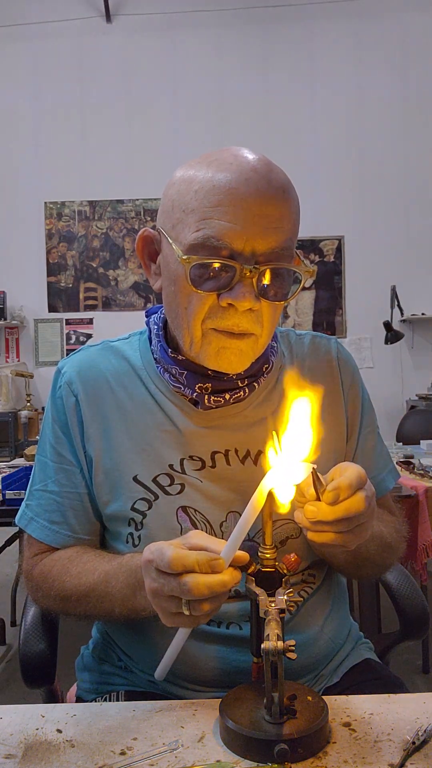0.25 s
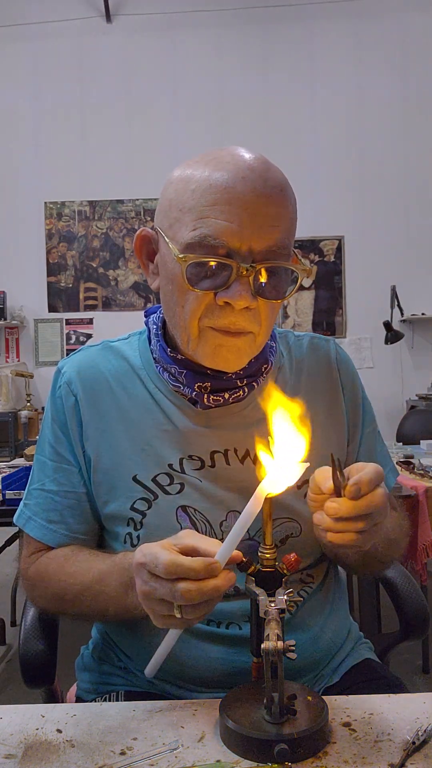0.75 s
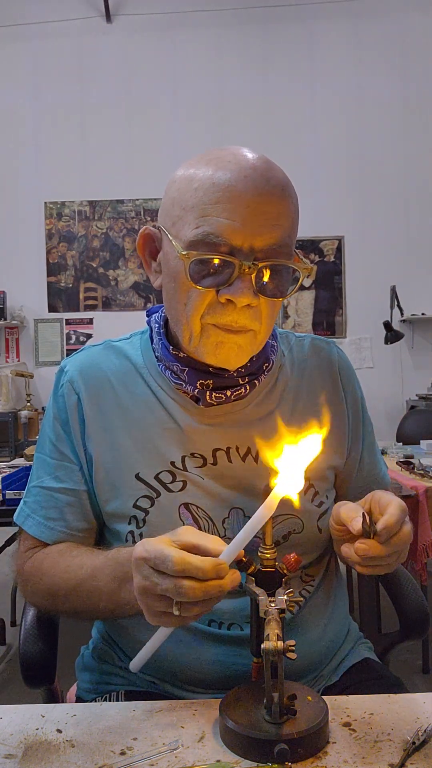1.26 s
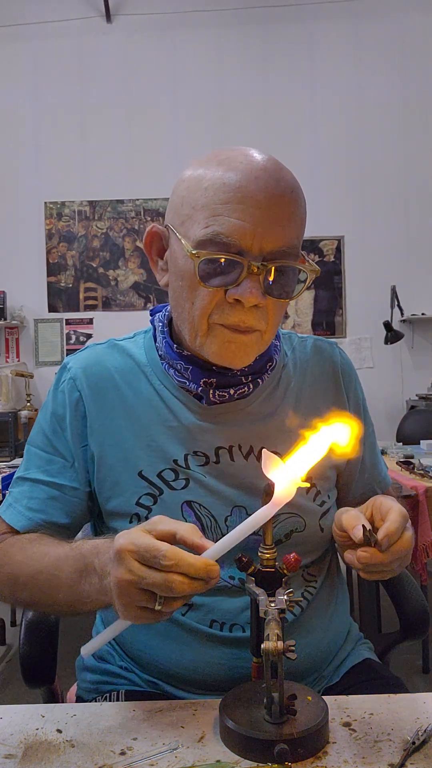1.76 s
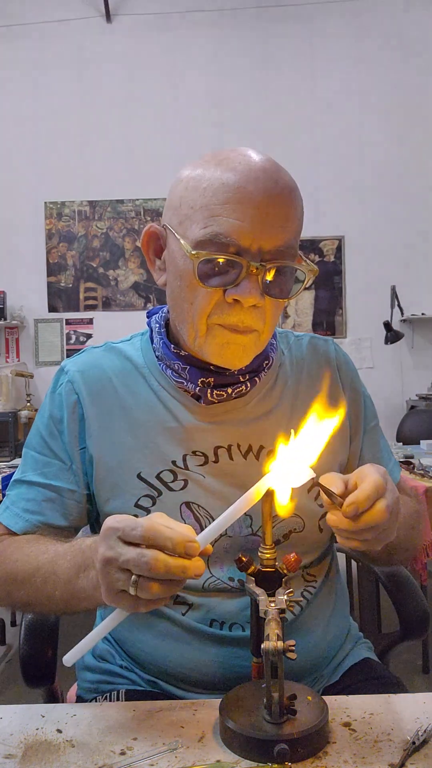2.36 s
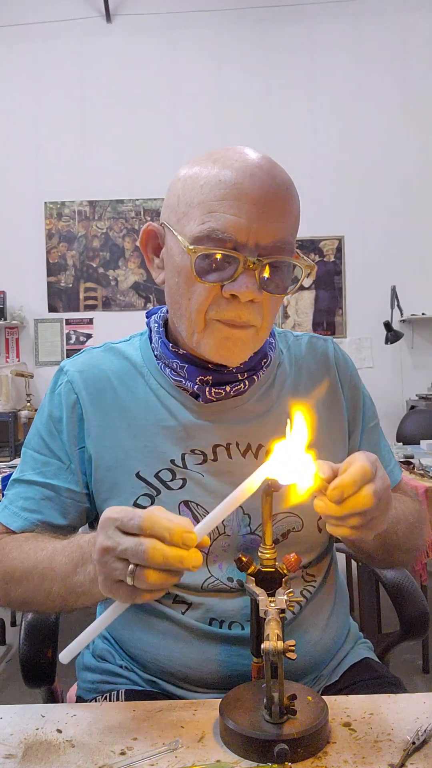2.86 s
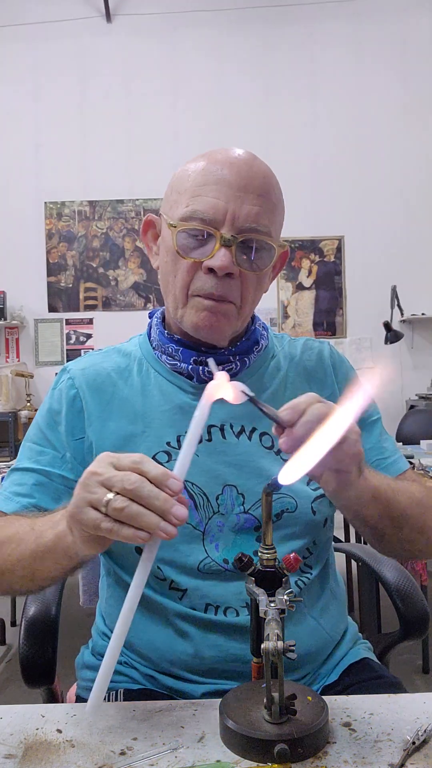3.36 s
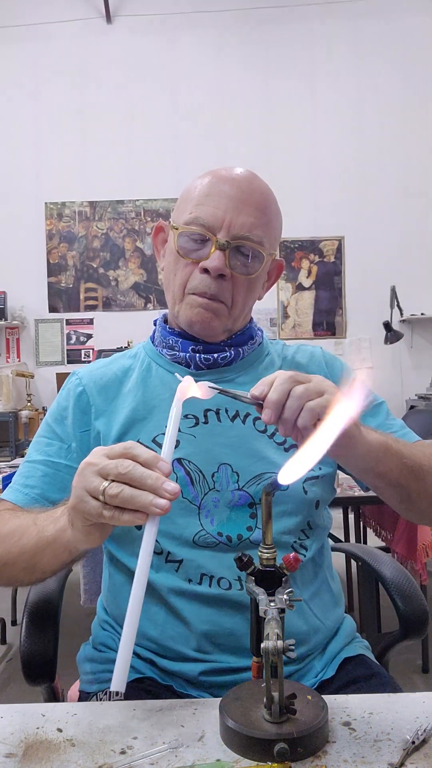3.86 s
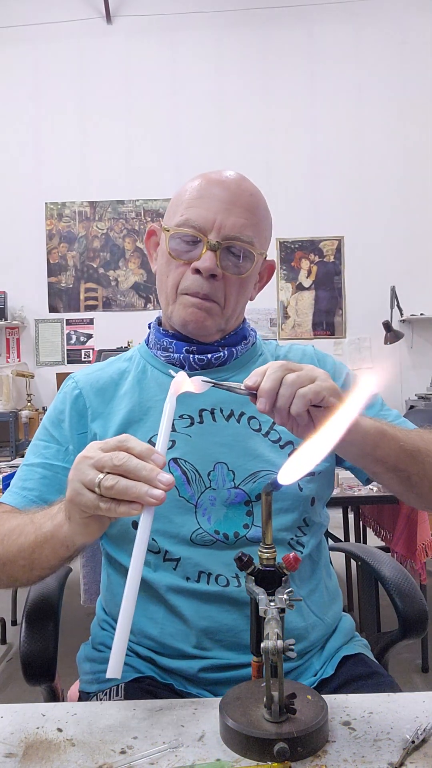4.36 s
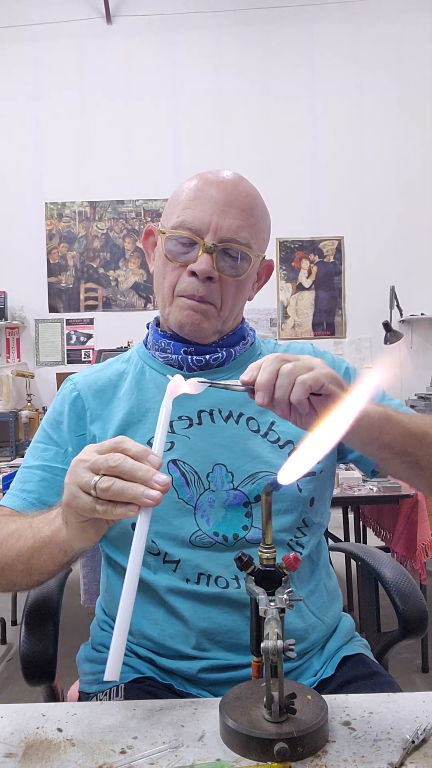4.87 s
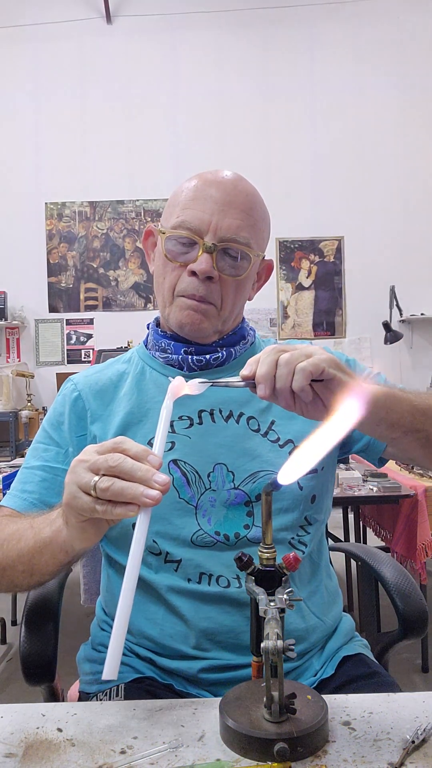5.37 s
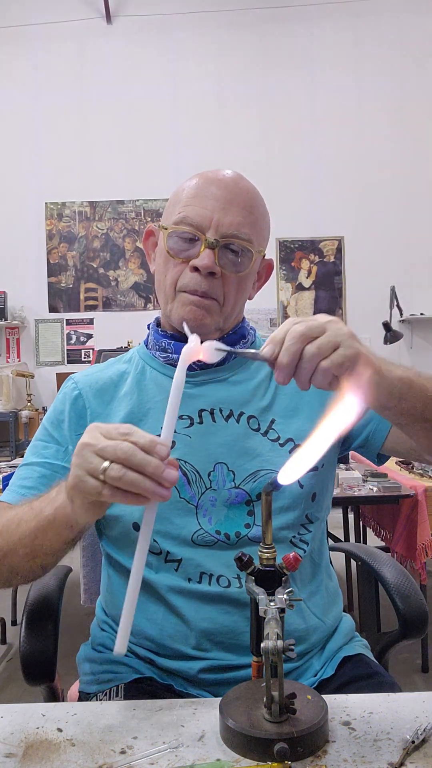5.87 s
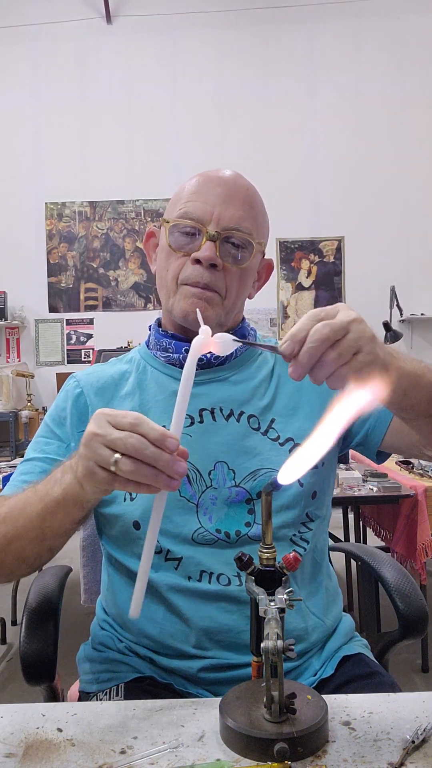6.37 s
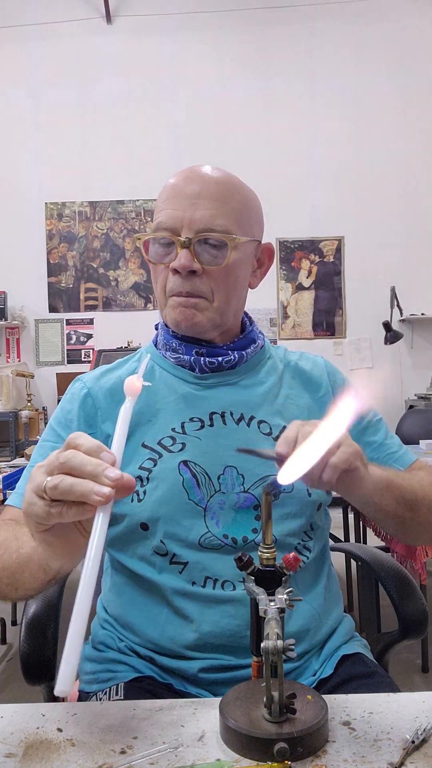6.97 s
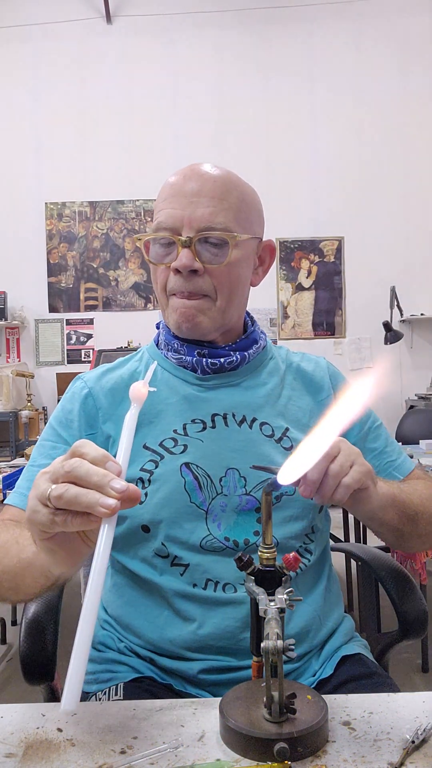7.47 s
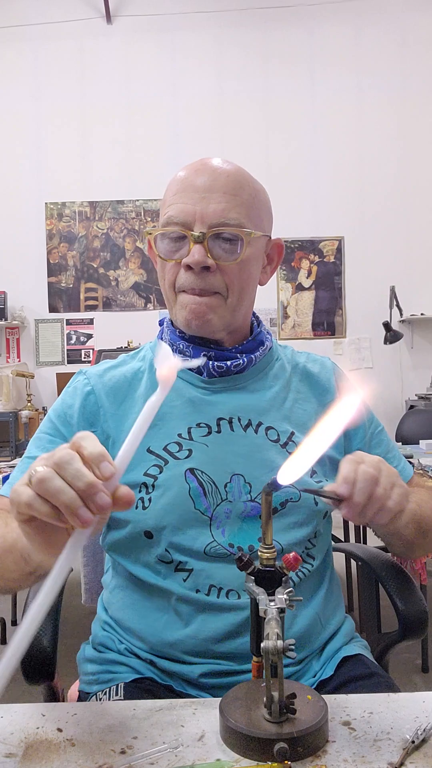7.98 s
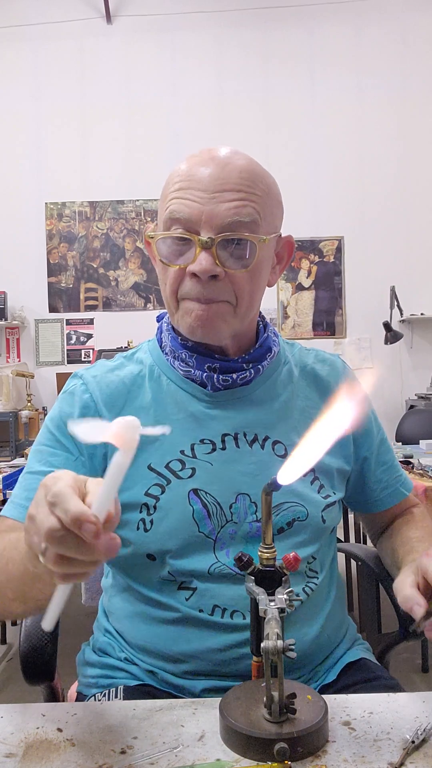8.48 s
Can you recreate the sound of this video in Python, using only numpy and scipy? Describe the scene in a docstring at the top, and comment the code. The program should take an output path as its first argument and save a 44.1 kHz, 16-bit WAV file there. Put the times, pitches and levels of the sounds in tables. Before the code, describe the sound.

Continuous bright hiss of a bench torch flame, slightly duller once glass leaves it, above a humming, beating machine drone and low rumble.

```python
"""A gas torch burns on a workbench near a phone: band-split noise flutters and sputters, coloured by narrow peaks
and dips that differ at the two microphone ports and shift as the glass leaves the flame.
Behind it a pump, built from sines at multiples of its shaft rate, slows and hums louder as pressure builds; a fan
sine beats against it, with a drone, a whine and steady tones. Shaped noise makes a throbbing rumble below,
and a faint short tone sounds once."""
import sys
import numpy as np
from scipy import signal
from scipy.fft import rfft, irfft, next_fast_len
from scipy.io import wavfile
from scipy.ndimage import uniform_filter1d, map_coordinates

SR = 44100
rng = np.random.default_rng(int(sys.argv[2]) if len(sys.argv) > 2 else 0)


def persist_wave(psi):
    """Save psi, clipped to +-1, as 16-bit WAV."""
    counts = np.round(np.clip(psi, -1, 1) * 32767).astype(np.int16)
    wavfile.write(sys.argv[1], SR, np.atleast_2d(counts).T)


N = 385287
TIME = np.arange(N) / SR
SIZE = next_fast_len(N)
HZ = np.arange(SIZE // 2 + 1) * SR / SIZE

# pump: a valve vents the pressure once a cycle, then it builds up again
VALVE_S, CYCLE_S, VENT_S, BUILD_S = 1.12, 5.23, .6, 2.7
# the glass leaves the flame
GLASS_OUT_S, GLASS_MOVE_S = 3.39, 0.2


def undb(db):
    """Amplitude factor of a level in dB."""
    return 10 ** (np.asarray(db) / 20)


def over_hz(table):
    """A (Hz, value) table read at every frequency bin, on a log frequency axis."""
    hz, value = np.transpose(table)
    return np.interp(np.log(HZ + 1), np.log(hz), value)


def over_time(table):
    """The columns of a (s, value, ..) table read at every sample."""
    s, *columns = np.transpose(table)
    return [np.interp(TIME, s, column) for column in columns]


def walk(rate_hz):
    """Random levels held 1 / rate_hz and slewed twice; spread near 1."""
    k = int(SR / rate_hz)
    held = np.repeat(rng.standard_normal(N // k + 1), k)
    slewed = uniform_filter1d(uniform_filter1d(held, k), k)
    return 1.327 * slewed[:N]


def flutter(rate_hz):
    """A quick walk with its slow drift taken out."""
    quick = walk(rate_hz)
    return quick - uniform_filter1d(quick, int(4 * SR / rate_hz))


def swell(at_s, half_s):
    """A flat-topped bump of height 1 around a moment."""
    return np.exp(-((TIME - at_s) / half_s) ** 4)


def swells_db(table):
    """Sum of the bumps in a (s, half length s, dB) table."""
    return sum(db * swell(at_s, half_s) for at_s, half_s, db in table)


def noise():
    """Spectrum of white noise at 0 dB per Hz."""
    return rfft(rng.standard_normal(SIZE)) * np.sqrt(SR / 2)


def tone(hz, rms_db, drift=0.00179, turns=None):
    """A sine whose pitch wanders by the share drift; it starts at a random phase unless one is given."""
    turns = rng.random() if turns is None else turns
    phase = 2 * np.pi * (turns + np.cumsum(hz * (1 + drift * walk(1.5))) / SR)
    return np.sqrt(2) * undb(rms_db) * np.sin(phase)


def rumble():
    """Shaped noise whose deep part throbs; returns the part alike at both ports and the part that differs."""
    # Rumble colour before the throb. Each row: frequency in Hz, level in dB per Hz.
    colour = [(25, -74), (38, -78), (50, -61), (65, -59.5), (95, -55.5), (120, -61.5), (150, -65.5),
              (190, -63.5), (215, -72), (250, -75), (300, -74.5), (350, -84), (420, -94), (600, -105),
              (900, -140)]
    # Throbs of the deep rumble. Each row: centre in seconds, change in dB.
    throbs = [(.84, 2), (1.1, -4), (1.82, 3.5), (2.15, 7), (2.999, 4), (3.38, 4.5), (3.72, 1), (4.1, 3),
              (4.65, 2), (5.95, 10.5), (6.9, 3), (7.2, 6.5), (8.15, 1), (8.451, 4)]
    throb_half_s, rest_db, split_hz = 0.084, -7, 108
    upper_share = 0.22  # of the throb's dB swing
    colour_db = over_hz(colour)
    alike, apart = noise() * undb(colour_db), noise() * undb(colour_db - 24.0)
    throb_db = rest_db + sum(db * swell(at_s, throb_half_s) for at_s, db in throbs)
    deep = irfft(alike * (HZ < split_hz), SIZE)[:N] * undb(throb_db)
    upper = irfft(alike * (HZ >= split_hz), SIZE)[:N]
    upper = upper * undb(upper_share * (throb_db - throb_db.mean()))
    # the ports differ more as the wavelength shrinks
    side = irfft(apart * (1 + np.clip(HZ / 230, 0, 3) ** 2), SIZE)[:N]
    return deep + upper, side


def steady_tones():
    """Sines of fixed centre pitch, each wandering in level and slightly in pitch."""
    # Each row: frequency in Hz, mid level in dB (RMS).
    tones = [(123.1, -55), (166.2, -56.5), (293.4, -68.5), (372.5, -75.5), (438.4, -75), (598, -79),
             (879, -79), (1018, -74.5), (1047, -70), (1108, -79.5), (2200, -78)]
    return sum(tone(hz, db + 3.9 * walk(2.48), drift=0.00249) for hz, db in tones)


def drone():
    """A low sine that swells several times."""
    # Each row: centre in seconds, half length in seconds, rise in dB.
    drone_swells = [(0.793, 0.088, 14.5), (2.62, 0.77, 13.5), (3.465, 0.14, 8), (3.9, 0.13, 17.5),
                    (4.303, 0.24, 12)]
    return tone(139.6, -56 + swells_db(drone_swells))  # Hz, dB at rest


def whine():
    """A sine, louder around each valve stroke, that fades late to a lower level."""
    rest_db, swell_db, half_s = -59.5, 3, 1.54
    fade_start_s, fade_length_s, fade_db = 7.35, 0.25, -11
    strokes = swell(VALVE_S, half_s) + swell(VALVE_S + CYCLE_S, half_s)
    fade = np.clip((TIME - fade_start_s) / fade_length_s, 0, 1)
    return tone(261.2, rest_db + swell_db * strokes + fade_db * fade + 1.6 * walk(3.02))


def fan():
    """A steady sine close enough to the 2nd shaft order to beat against it."""
    return tone(58.69, -49, drift=0, turns=.62)  # Hz, dB


def pump_load():
    """0-1: drops as the valve vents, climbs back ever faster, then holds."""
    since_s = (TIME - VALVE_S) % CYCLE_S
    venting = np.clip(1 - since_s / VENT_S, 0, 1)
    building = np.clip((since_s - VENT_S) / BUILD_S, 0, 1) ** 2
    return venting + building


def pump():
    """Sines at multiples of the shaft rate; load slows the shaft and raises the 2nd and 4th orders."""
    # Lesser orders. Each row: multiple of the shaft rate, mid level in dB (RMS).
    shaft_orders = [(1, -59.5), (12, -63.5), (14, -73), (20, -72), (22, -81), (24, -74), (26, -76)]
    free_shaft_hz, sag_hz = 28.499, .288
    second_db, fourth_db = (-44, -41), (-41, -38)  # (free, loaded)
    load = pump_load()
    shaft_hz = free_shaft_hz - sag_hz * load
    second = tone(2 * shaft_hz, np.interp(load, (0, 1), second_db), drift=0, turns=0)
    fourth = tone(4 * shaft_hz, np.interp(load, (0, 1), fourth_db) + 2.14 * flutter(10), drift=0)
    lesser = sum(tone(k * shaft_hz, db + 2.0 * walk(2.46)) for k, db in shaft_orders)
    return second + fourth + lesser


def machines():
    """Pump, fan, tones and rumble; nearly alike at both ports, a touch louder at the left."""
    alike, side = rumble()
    mid = pump() + fan() + drone() + whine() + steady_tones() + alike
    return mid * undb([[.2], [-.2]]) + side * np.array([[1], [-1]])


def tick():
    """A faint short sine under a bell-shaped envelope, perhaps the tool touching the glass."""
    at_s, hz, peak_db, length_s = 3.935, 2305, -52.5, .045
    return undb(peak_db) * np.exp(-((TIME - at_s) / length_s) ** 2) * np.sin(2 * np.pi * hz * TIME)


def in_flame(s):
    """Near 1 while the glass sits in the flame, near 0 once it is out."""
    return .5 - .5 * np.tanh((s - GLASS_OUT_S) / GLASS_MOVE_S)


def port(colour, ripple, hz, s):
    """dB over frequency and time: broad colour plus narrow peaks and dips that slide and change with the glass."""
    # Dips and ridges shared by both ports. Each row: centre in Hz, width in Hz,
    # dB with the glass in the flame, dB with it out.
    both_ripple = [(2820, 90, -6, -3), (4220, 175, -15, -23), (4550, 70, 5, 5.5), (4660, 88, -11, -6),
                   (5480, 80, 4, 2.5), (5690, 68, 2, -8), (12100, 420, -1, -2.5), (13200, 400, 0.5, 2.5),
                   (555, 55, -4, 1.5), (10300, 200, -6, -6), (1370, 50, 2.5, 1.5), (1590, 68, 3, 2.5),
                   (3250, 280, 1, 0), (3620, 88, 3.5, 2.5), (2160, 85, -4, -14)]
    wander, glass_wander = 0.0018, .005  # share of pitch: always, extra while the glass is in
    bells = sum(np.exp(-4 * np.log(2) * ((HZ - at_hz) / width_hz) ** 2) * np.array([[db_in], [db_out]])
                for at_hz, width_hz, db_in, db_out in ripple + both_ripple)
    glass = in_flame(s)
    slide = (wander + glass_wander * glass) * np.interp(s, TIME, walk(2.47))
    slid_hz = hz[:, None] * (1 + slide)
    glass_in, glass_out = (np.interp(slid_hz, HZ, bell) for bell in bells)
    low_cut_db = 40 * np.log10(np.clip(hz / 400, 1e-3, 1))
    broad = np.interp(hz, HZ, over_hz(colour)) + low_cut_db
    return broad[:, None] + glass * glass_in + (1 - glass) * glass_out


def colour_ports(x, depth_db, cell_hz, cell_s):
    """Each port's colour; narrow bands also drift up and down on their own, alike at both ports."""
    # Broad flame colour at each port. Each row: frequency in Hz, level in dB per Hz.
    left_colour, right_colour = [(400, -83), (1000, -84.5), (2700, -94.5), (3400, -91), (4200, -88.5),
                                 (5300, -89), (6800, -76.5), (8300, -88.5), (10500, -92.5), (12000, -85),
                                 (13200, -80.5), (14300, -86), (15600, -103.5)], [(400, -83.0), (1000, -78), (2700, -90.5), (3400, -82.5),
                                                    (4200, -99.5), (5300, -92.5), (6800, -99), (8300, -93),
                                                    (10500, -106.0), (12000, -87), (13200, -88),
                                                    (14300, -102.5), (14900, -116.5)]
    # Peaks and dips of the hiss at each port. Each row: centre in Hz, width in Hz,
    # dB with the glass in the flame, dB with it out.
    left_ripple, right_ripple = [(590, 210, -2.5, 0.0), (740, 110, -2.0, -4.5), (950, 90, -5.5, -6.0),
                                 (1060, 90, 4.5, 3.0), (1180, 190, -6.0, -3.5), (1310, 60, 5.5, 2.0),
                                 (1410, 100, -1.0, 5.5), (1470, 120, -5.0, -6.5), (1650, 200, 6.0, 2.5),
                                 (1730, 70, -5.5, -5.5), (1830, 60, 3.0, 2.5), (1920, 60, -3.0, -2.5),
                                 (2000, 70, 3.5, 0.0), (2320, 230, 5.5, 4.5), (2810, 200, 0.0, -3.5),
                                 (3160, 240, 5.5, 1.5), (4150, 470, -6.0, -10.5), (4240, 160, -9.0, -10.0),
                                 (4450, 140, -0.5, -7.0), (4820, 220, -5.5, -13.5), (4940, 170, -4.0, 0.5),
                                 (5160, 160, -4.0, -5.0), (5400, 240, 14.0, 7.0), (5920, 140, 2.0, 7.0),
                                 (6000, 740, -1.0, -4.0), (6410, 210, -5.5, -4.5), (7110, 180, -5.0, -5.5),
                                 (7680, 490, 8.5, 4.5), (8530, 420, 6.0, 7.0), (9230, 560, 8.0, 7.0),
                                 (10120, 320, 4.5, 4.0), (11300, 470, 1.5, -2.5), (11610, 270, 4.5, 4.5),
                                 (12700, 220, -1.5, -4.0), (13740, 740, -1.5, -5.0), (15460, 180, 0.5, 7.0)], [(570, 90, -0.5, 5.0), (750, 420, -7.0, -8.0),
                                                      (800, 60, 5.0, 1.0), (860, 150, -3.5, -2.0),
                                                      (1190, 140, -12.0, -9.5), (1390, 60, -1.0, 2.5),
                                                      (1530, 100, -8.0, -7.5), (1610, 170, 2.0, -1.5),
                                                      (1710, 60, -5.5, -4.5), (1810, 60, 1.0, 1.5),
                                                      (1900, 80, -7.0, -7.0), (2160, 180, -2.0, -4.5),
                                                      (2870, 640, -6.0, -7.5), (3120, 230, 6.5, 4.5),
                                                      (3670, 220, 4.5, 5.0), (4020, 210, 4.0, -1.5),
                                                      (4230, 150, -7.5, -9.5), (4510, 330, 6.5, -2.0),
                                                      (4600, 140, 2.0, 8.0), (4850, 150, -2.0, -8.0),
                                                      (5370, 160, 10.5, 6.5), (5530, 140, 5.0, -0.5),
                                                      (5910, 160, 4.5, 5.5), (6110, 260, -2.5, -5.5),
                                                      (6900, 630, 8.5, 5.0), (7180, 180, -5.0, -5.0),
                                                      (7670, 410, 5.5, 5.0), (8250, 340, -8.0, -6.5),
                                                      (8830, 220, -2.0, -5.5), (9160, 170, 5.5, 5.0),
                                                      (9530, 170, 2.5, 3.5), (10130, 220, 7.0, 6.0),
                                                      (11930, 700, 6.5, 3.0), (12610, 320, -0.5, -4.0),
                                                      (13300, 250, -3.0, -4.5), (13960, 180, 2.0, 6.0)]
    hz, s, frames = signal.stft(x, SR, nperseg=2048)
    field = rng.standard_normal((int(SR / 2 / cell_hz) + 3, int(N / SR / cell_s) + 3))
    drift = map_coordinates(field, np.meshgrid(hz / cell_hz, s / cell_s, indexing="ij"), order=3)
    db = np.array([port(left_colour, left_ripple, hz, s), port(right_colour, right_ripple, hz, s)])
    # shallower drift below 4500 Hz
    db = db + depth_db * drift * np.clip(hz / 4500, .35, 1)[:, None]
    return signal.istft(frames * undb(db), SR, nperseg=2048)[1][:, :N]


def puffs(rate_hz, fall_s):
    """Random pockets of gas catch at once and die away; spread 1."""
    kicks = (rng.random(N) < rate_hz / SR) * rng.random(N)
    decayed = signal.lfilter([1], [1, -np.exp(-1 / (fall_s * SR))], kicks)
    swing = uniform_filter1d(decayed, size=60)
    return (swing - swing.mean()) / swing.std()


def surges():
    """Quick rise and slower fall in dB at each sputter of the jet."""
    # Each row: start in seconds, peak level in dB, rise time in seconds.
    sputters = [(0.192, -40.5, 0.0073), (0.2369, -37, 0.0053), (0.3476, -38, 0.0045), (0.5965, -42, 0.0055),
                (1.2271, -41, 0.004), (2.2533, -38, 0.0034), (2.366, -39, 0.0077), (2.8873, -39, 0.0053),
                (5.857, -36.5, 0.0048), (6.945, -36, 0.0082), (6.9974, -43, 0.0065), (7.438, -39.5, 0.006),
                (8.2182, -42, 0.0054)]
    hiss_peak_db = -43.5  # reference: peak level of the hiss between surges
    db = np.zeros(N)
    for start_s, peak_db, rise_s in sputters:
        u = np.clip((TIME - start_s) / max(rise_s, .003), 0, 30)
        db += (peak_db - hiss_peak_db) * u * np.exp(1 - u)
    return db


def flame_at_ports():
    """Noise spectra at both ports: a shared part that the right port leads, plus a part of each port's own."""
    # Flame noise heard alike at both ports. Each row: frequency in Hz, share of power 0-1.
    alike_share = [(400, .6), (1200, .6), (1700, .85), (2500, .85), (3000, .5), (3900, .75), (6000, .75),
                   (7300, .8), (10500, .65), (13000, .75), (15000, .4)]
    # Lead of the right port. Each row: frequency in Hz, phase in radians.
    right_lead = [(400, 1), (700, 1.4), (1000, 2.5), (1350, 1.5), (1500, -3), (1650, 0), (2000, -1),
                  (2170, -1), (2260, -0.5), (2650, -1), (2850, 3), (3250, 8), (3550, 7.5), (3850, 9.5),
                  (4500, 13), (6500, 19), (12100, 44), (12900, 43.5), (13600, 50)]
    alike = np.sqrt(np.clip(over_hz(alike_share), 0, 1))
    direct = noise()
    return np.array([alike * direct * np.exp(1j * lead) + np.sqrt(1 - alike ** 2) * noise()
                     for lead in (0, over_hz(right_lead))])


def hiss_swings():
    """Slow dB swings of five bands, each about its own mean with the glass in and with the glass out."""
    # Slow hiss level as glass, tool and hands move about the flame; only its swings are used.
    # Each row: time in seconds, level in dB near 3.2, 5.4, 6.8, 7.6 and 12.5 kHz.
    hiss_level = [(0.0, -57.5, -53.5, -50.0, -51.5, -48.0), (0.34, -58.5, -54.0, -49.5, -51.0, -48.0),
                  (0.67, -59.0, -54.0, -51.5, -51.5, -50.0), (1.01, -58.5, -53.5, -50.5, -50.0, -50.5),
                  (1.34, -59.0, -56.0, -52.0, -52.5, -51.0), (1.68, -59.0, -55.0, -52.0, -50.5, -50.0),
                  (2.02, -58.0, -55.5, -53.0, -50.5, -51.5), (2.35, -57.5, -53.5, -51.5, -48.0, -50.0),
                  (2.69, -56.5, -55.5, -51.0, -48.0, -49.0), (3.03, -60.0, -56.0, -49.5, -48.5, -50.5),
                  (3.36, -60.0, -59.0, -51.5, -51.0, -51.0), (3.7, -61.0, -61.5, -54.5, -54.5, -52.5),
                  (4.03, -61.0, -62.0, -55.0, -55.5, -51.5), (4.37, -61.0, -61.5, -53.0, -53.0, -51.5),
                  (4.71, -60.5, -61.0, -53.0, -53.5, -50.5), (5.04, -61.5, -61.5, -53.5, -55.5, -51.5),
                  (5.38, -61.5, -64.0, -55.0, -55.5, -52.0), (5.71, -61.5, -62.0, -53.0, -54.5, -50.5),
                  (6.05, -60.5, -61.0, -51.0, -53.0, -49.5), (6.39, -59.0, -59.0, -49.5, -52.0, -49.5),
                  (6.72, -59.0, -58.0, -49.5, -50.5, -50.0), (7.06, -60.0, -58.5, -48.5, -49.5, -49.0),
                  (7.4, -60.0, -59.0, -50.5, -50.0, -51.5), (7.73, -60.0, -59.0, -50.0, -51.5, -52.0),
                  (8.07, -59.0, -56.5, -52.0, -51.5, -51.5), (8.4, -60.5, -59.5, -50.5, -50.5, -51.5),
                  (8.74, -60.5, -57.0, -52.5, -52.5, -51.0)]
    glass = in_flame(TIME)
    return [level - glass * np.average(level, weights=glass)
            - (1 - glass) * np.average(level, weights=1 - glass) for level in over_time(hiss_level)]


def flame():
    """Turbulent noise; eddies flutter the low roar and the hissing jet, each band also flickers alone."""
    # The low roar swells and dips briefly.
    # Each row: centre in seconds, half length in seconds, change in dB before each band's share.
    roar_swells = [(.76, 0.041, 3), (1.402, .12, 2), (2.42, 0.24, 1), (2.85, 0.2, -2), (4.4, 0.32, 1),
                   (6.925, 0.055, 2)]
    jet_db = .5 * walk(9) + .7 * puffs(60, .01) + 1.05 * flutter(120) + .8 * flutter(240) + surges()
    roar_db = .7 * walk(9) + .9 * puffs(60, .008) + 1.9 * flutter(85) + swells_db(roar_swells)
    k3, k5, k7, k8, k12 = hiss_swings()
    # (upper edge Hz, slow swing dB, share of roar_db, share of jet_db)
    bands = [(658, -.3 * k7, .1, 0), (1203, 0.069 * k3, .6, 0), (1486, .1 * k3, 1, 0),
             (1779, 0.17 * k3, 1, 0), (2791, 0.17 * k3, 1, 0), (3400, k3, .39, .29),
             (3950, .3 * k3, .35, .3), (5220, 0.37 * k5, .31, .35), (5697, k5, 0, .6),
             (6300, 0.55 * k7, 0, 1), (7120, k7, 0, 1), (8050, k8, 0, 1),
             (11102, 0.81 * k12, 0, 1), (12698, k12, 0, 1.1), (SR, .9 * k12, 0, 1)]
    ports = flame_at_ports()
    out, low_hz = 0, 0
    for high_hz, slow_db, roar, jet in bands:
        band = irfft(ports * ((HZ >= low_hz) & (HZ < high_hz)), SIZE)[:, :N]
        flicker_db = 1.27 * walk(13) + 1.13 * flutter(100)
        out = out + band * undb(slow_db + roar * roar_db + jet * jet_db + flicker_db)
        low_hz = high_hz
    return colour_ports(out, depth_db=3.3, cell_hz=32, cell_s=.9)


def scene():
    """Machines, the short tone and the flame at both ports."""
    return machines() + tick() + flame()


def record(dry):
    """The phone cuts the top steeply, a little lower at the right port."""
    top_hz = 15760, 14900  # left, right
    cuts = [signal.ellip(12, .2, 80, hz, fs=SR, output="sos") for hz in top_hz]
    return np.array([signal.sosfilt(sos, channel) for sos, channel in zip(cuts, dry)])


dry = scene()
out = record(dry)
persist_wave(out)
```